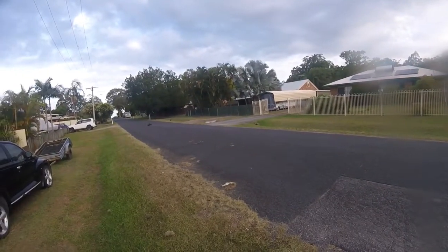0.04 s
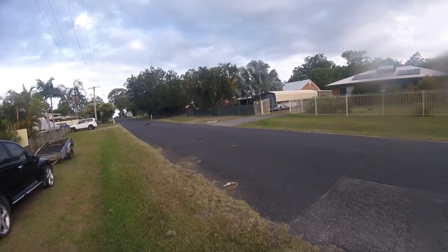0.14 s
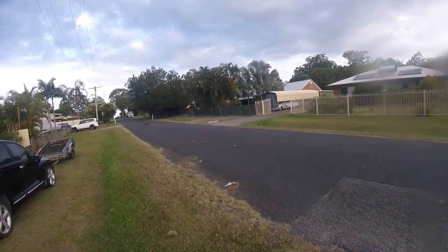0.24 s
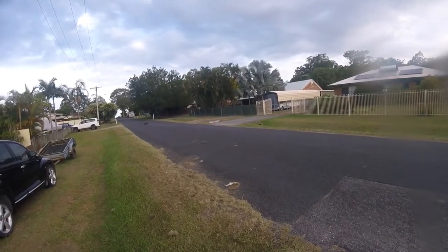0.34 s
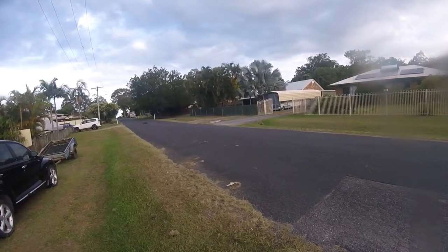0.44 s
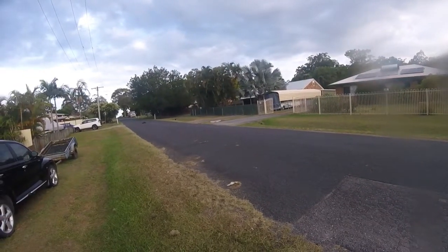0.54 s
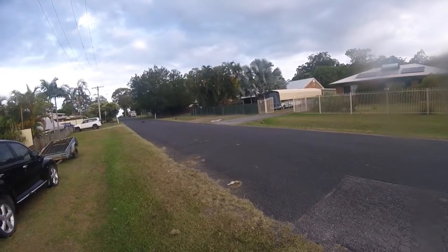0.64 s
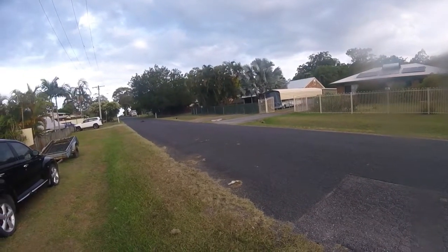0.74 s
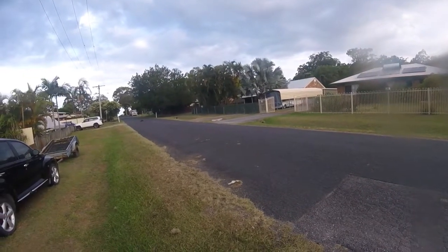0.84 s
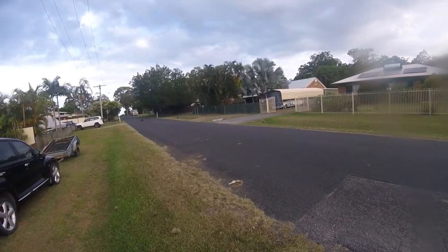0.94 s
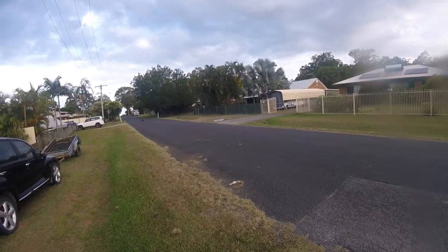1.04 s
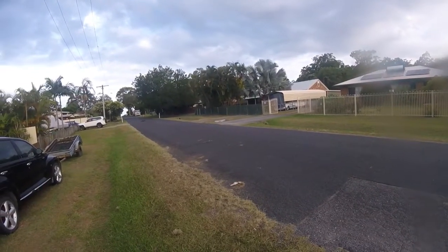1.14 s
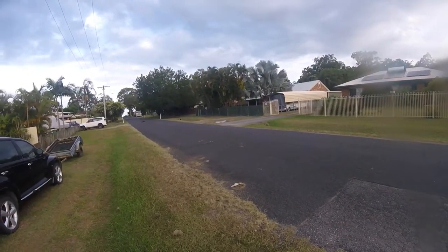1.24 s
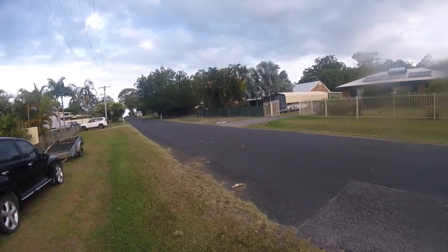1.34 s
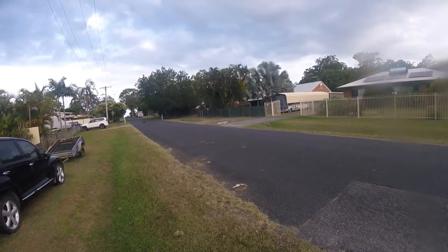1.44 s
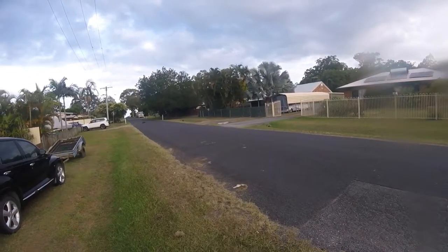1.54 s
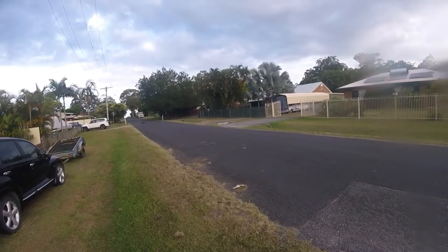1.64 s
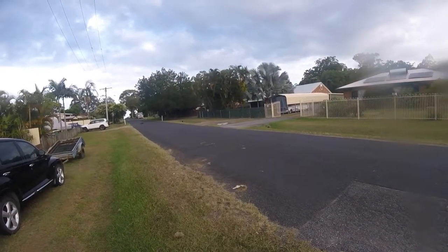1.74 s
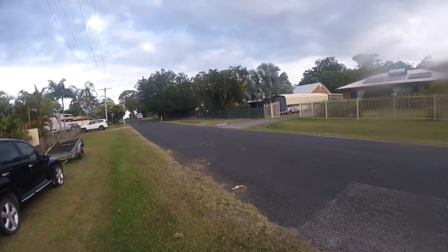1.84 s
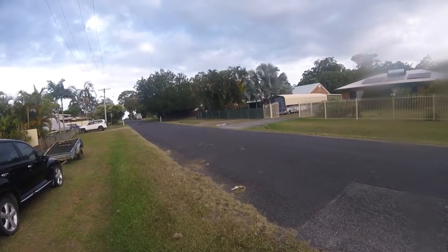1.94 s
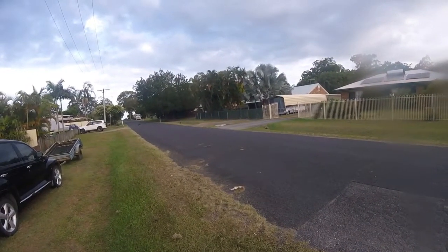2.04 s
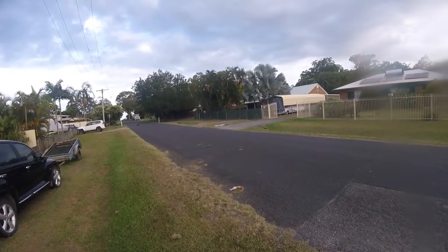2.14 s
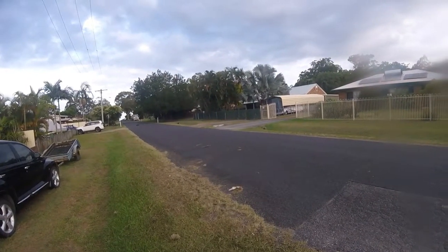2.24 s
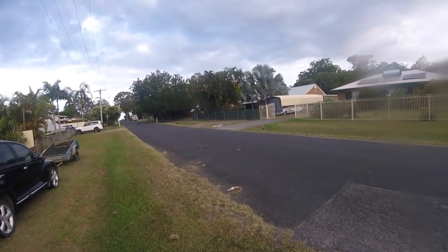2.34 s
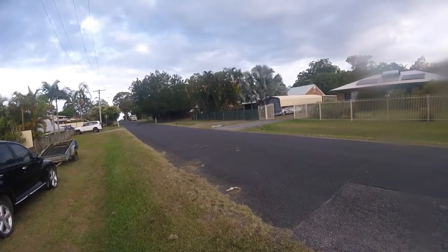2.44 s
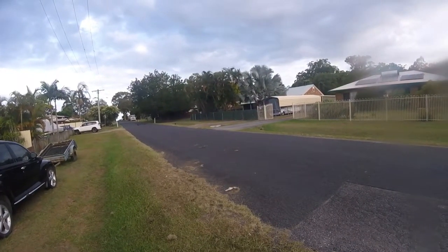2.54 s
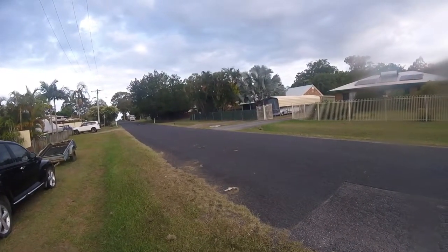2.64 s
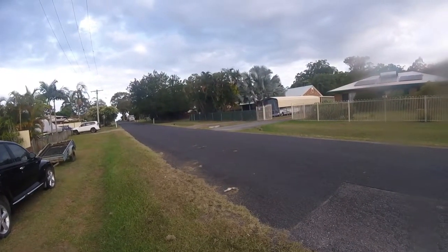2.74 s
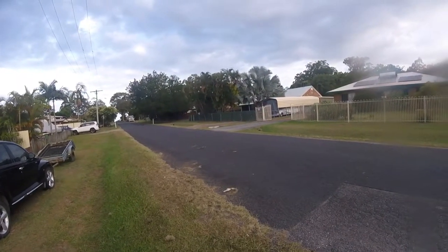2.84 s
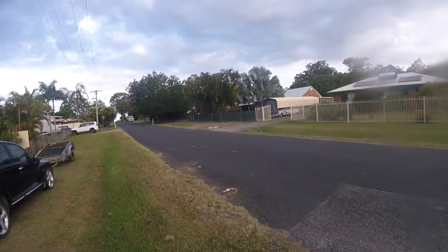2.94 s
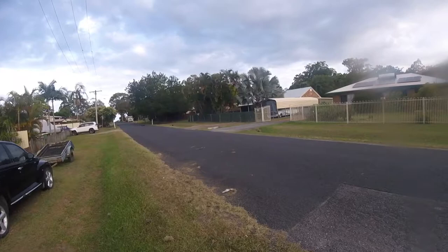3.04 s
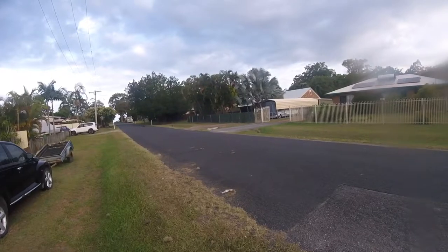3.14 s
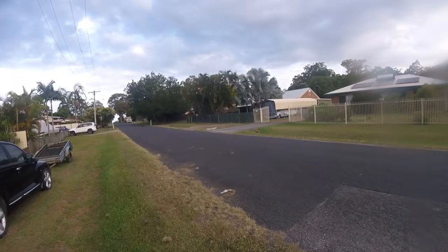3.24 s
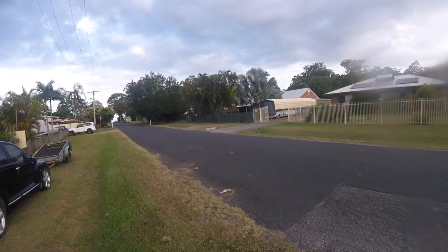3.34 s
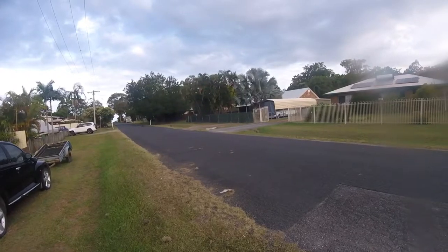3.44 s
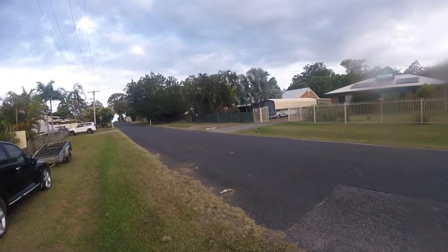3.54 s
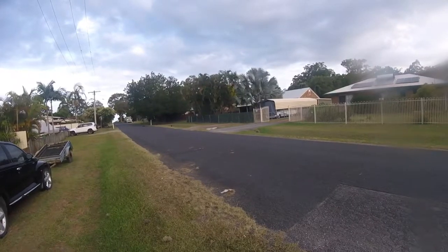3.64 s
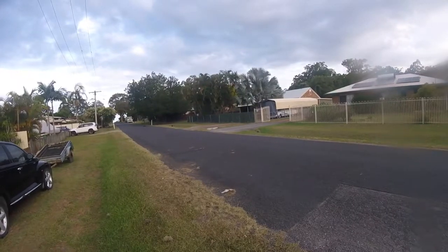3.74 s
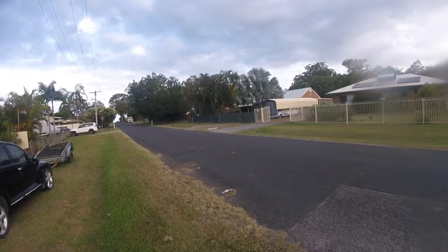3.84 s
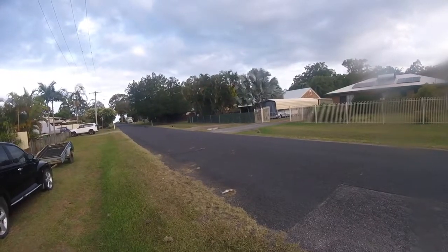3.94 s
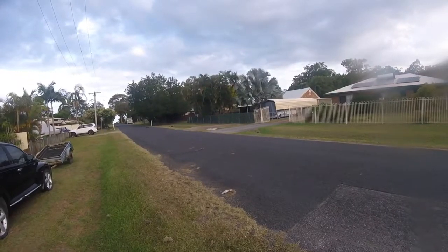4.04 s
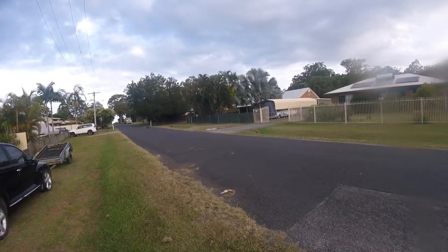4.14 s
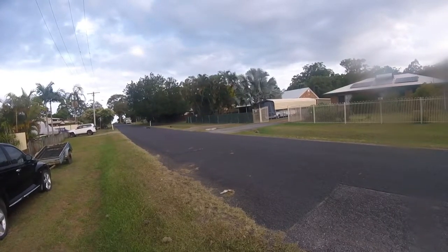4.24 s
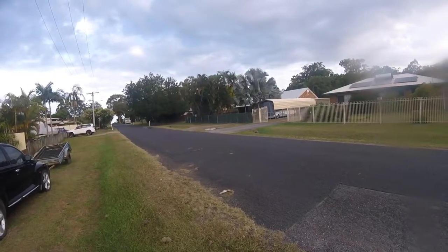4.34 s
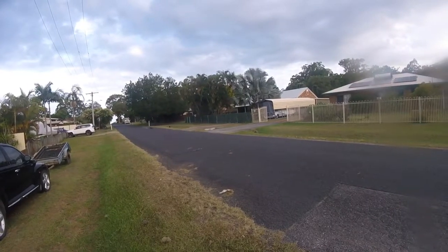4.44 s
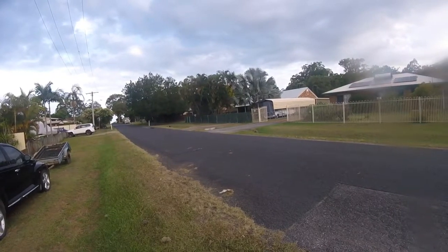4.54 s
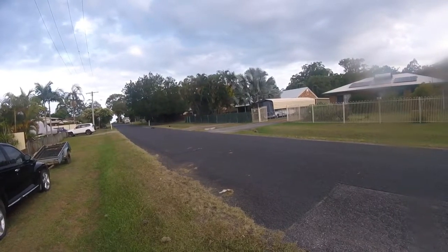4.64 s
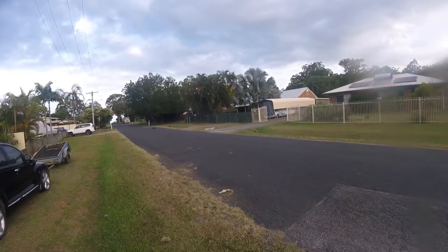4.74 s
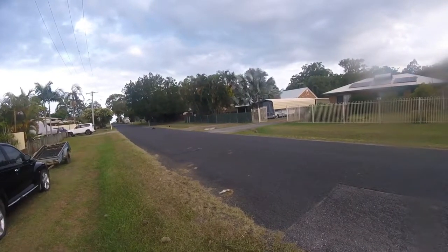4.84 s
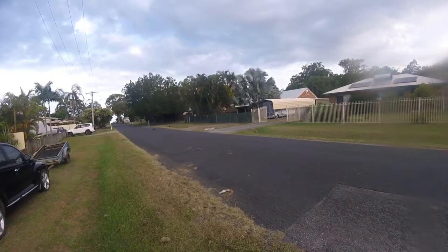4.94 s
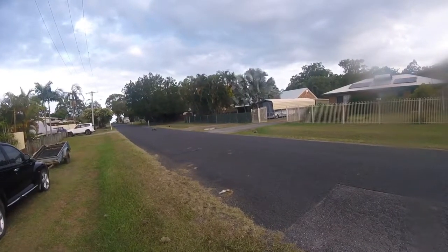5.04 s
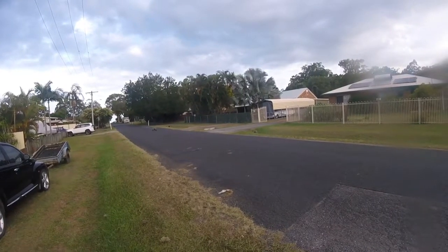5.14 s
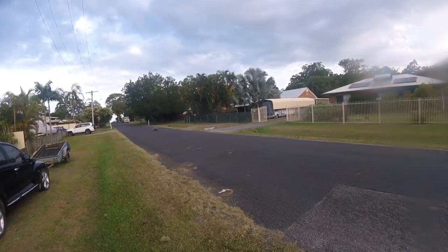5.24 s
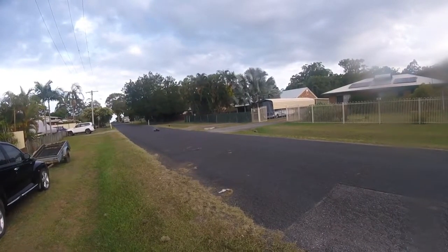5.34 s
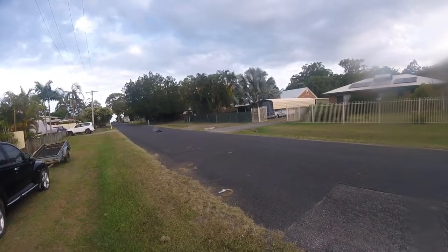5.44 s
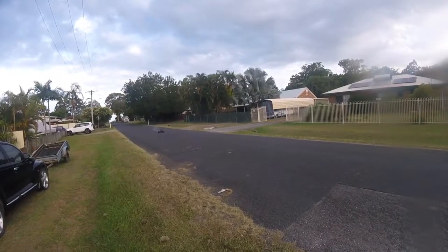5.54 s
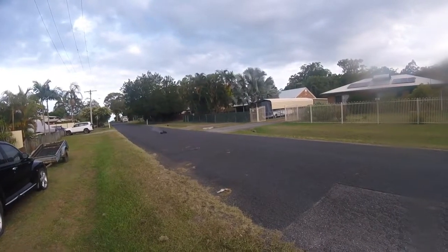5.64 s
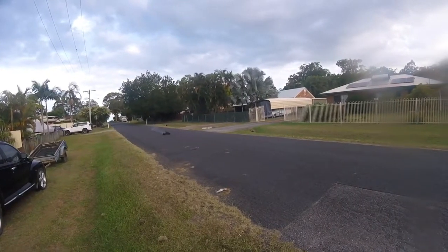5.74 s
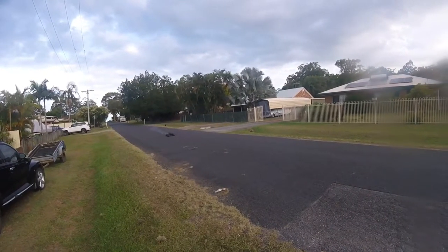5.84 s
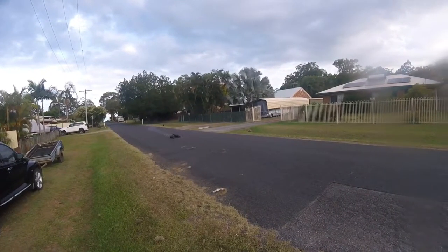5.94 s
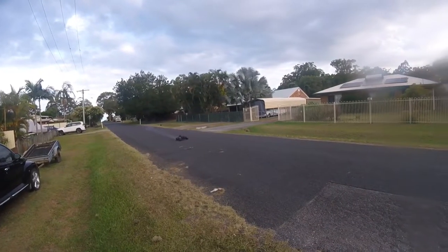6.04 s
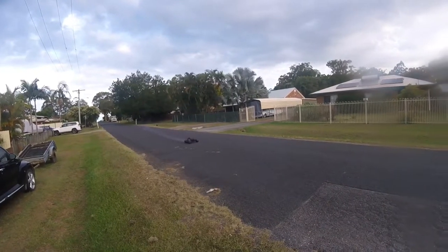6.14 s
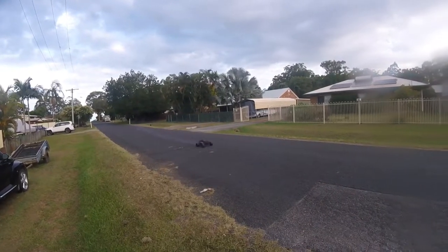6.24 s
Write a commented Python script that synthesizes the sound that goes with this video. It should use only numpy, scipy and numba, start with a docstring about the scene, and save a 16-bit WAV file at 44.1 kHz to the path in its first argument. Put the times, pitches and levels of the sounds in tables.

```python
"""A small glow-plug two-stroke in a model truck, far down a quiet street, heard on one microphone.
It lifts off, idles with uneven burning, then accelerates through a gear change and comes close.
Firings ring a tuned pipe, gas hisses, the clutch shoes rattle their bell and the tyres roar.
The road's echo hollows the sound; fences and houses scatter it over a low outdoor rumble.
A few dry ticks come just before the truck pulls away."""
import sys
import numpy as np
from scipy import signal
from scipy.fft import rfft, irfft, next_fast_len
from scipy.io import wavfile
from scipy.ndimage import uniform_filter1d
from numba import njit

SR = 44100
rng = np.random.default_rng(int(sys.argv[2]) if len(sys.argv) > 2 else 0)


def store_pcm(level_fs):
    """Save levels as 16-bit WAV."""
    pcm = np.round(np.clip(level_fs, -1, 1) * 32767).astype(np.int16)
    wavfile.write(sys.argv[1], SR, np.atleast_2d(pcm).T)


N = 277389
TIME = np.arange(N) / SR
HZ = np.fft.rfftfreq(2 * next_fast_len((N + SR) // 2, real=True), 1 / SR)

LIFT_S, OPEN_S, SHIFT_S = 0.3, 3.5, 5.085  # throttle shuts, throttle opens, second gear engages
LIFT_TAKES_S, OPEN_TAKES_S = 0.106, 0.056
COAST_S, EVEN_BURN_S, CLOSE_S = (.275, .64), (2.05, 2.3), (5.51, 6.28)  # start and end of each spell

# The run: lift-off, idle, blip, two gears. Each row: time in seconds, shaft rate in Hz, bark in dB.
ENGINE_RUN = [(0.0, 446, -19.5), (0.2, 458.5, -24), (0.26, 434.4, -25), (0.33, 351.4, -30.5),
              (0.4, 326.4, -33), (0.48, 312, -31.5), (0.61, 233.6, -35), (0.8, 218.7, -35),
              (1.6, 231.2, -36.5), (2.2, 233.3, -38.5), (2.45, 232.2, -38), (3.0, 237.3, -40.5),
              (3.47, 238.5, -40.5), (3.545, 346, -34.5), (3.58, 316, -34.5), (3.735, 314.5, -35),
              (3.775, 358, -31), (3.88, 387.5, -27.5), (4.2, 411.4, -27), (4.45, 444.6, -26.5),
              (4.56, 469.7, -25), (4.85, 494.3, -23.5), (5.03, 513.4, -23.5), (5.081, 510, -22),
              (5.092, 419.3, -23.5), (5.17, 436.4, -23.5), (5.38, 459, -23.5), (5.64, 464.7, -21),
              (5.9, 497.4, -17.5), (6.2, 510, -16.5), (6.25, 483, -18), (6.29, 477, -19.5)]
# The coasting engine catches now and then. Each row: centre in seconds, length in seconds.
COAST_CATCHES = [(0.306, 0.018), (0.368, 0.015), (0.392, 0.011), (0.417, 0.021), (0.498, 0.027),
                 (0.554, 0.026), (0.613, 0.05)]
# The truck as the microphone sees it. Each row: time in seconds, view (0 leaving, 1 pulling away,
# 2 far, 3 midway, 4 near, 5 close).
TRUCK_VIEW = [(0, 0.13), (.4, 0.16), (3.45, 1.25), (3.7, 1.39), (3.8, 2.11), (4.3, 2.37), (4.75, 3.3),
              (5.1, 2.96), (5.4, 3.73), (5.75, 4), (5.95, 5.22), (6.29, 5.14)]
# Hot pipe and shell under load, as the road reflects them. Each row: frequency in Hz, width in Hz,
# then relative level in dB for each of the six views.
PIPE_MODES = [(706, 91, -38, 0.5, -6, -39, -22, -26), (970, 256, -10.5, -9.5, -30, -9.5, -48, -15),
              (1212, 240, -34, -3.5, -13, -11, -40, -40), (1548, 236, -48, 1, -6.5, -5.5, -47, -21),
              (1833.4, 210, -3.5, 7.5, 7, -4, 4, 3.5), (1984, 564, 0.5, -28, -15, -1, -2, 0.5),
              (2325, 85, 5, 2, 7.5, -20, -9, -13), (2477, 194, 8.5, 4, 6.5, 4, -0.5, 1.5),
              (2736, 150, 2.5, 11, -14, 6, -0.5, 4), (3065, 86, -18, 8.5, 1, -2, 7.5, -5.5),
              (3547, 120, -27, -33, -15, -41, -14, -4.5), (3820, 99.6, -32, -46, -46, -23, -5, -14),
              (4190, 120, -28, -27, -16, -8.5, -14, -26), (4620, 100, -26, -30, -9, -14, -5.5, -25),
              (5045, 140, -9.5, -27, -8, -9.5, -9, -30), (5610, 260, -15, -30, -14, -11.5, -16, -15)]
# The pipe's tone. Each row: time in seconds, level in dB against the bark.
PIPE_TONE_LEVEL = [(0, -2.5), (.26, -2), (.33, -28), (.6, -1), (.85, -5), (1.1, -6.5), (1.3, -1), (2.0, -3),
                   (3.45, 5.5), (3.6, 3.5), (3.9, 4.5), (5.1, 2), (5.65, 6), (5.85, 1), (5.98, 5),
                   (6.17, 4.5), (6.21, 1.5), (6.25, -2), (6.29, -2)]
# Spectrum of the exhaust hiss. Each row: frequency in Hz, relative level in dB.
GAS_COLOUR = [(2400, -46), (3300, 0.5), (4200, 2.5), (5200, 3), (6500, 0), (7600, -4), (8800, -8.5),
              (9600, -21), (10800, -19), (11500, -34.5)]
# Rings of the loose clutch bell. Each row: frequency in Hz, width in Hz, relative level in dB.
LOOSE_BELL_MODES = [(5870, 420, 0), (6260, 520, -3), (7200, 350, -8), (7550, 450, -11)]
# Rattle of the loose bell. Each row: time in seconds, level in dB with the throttle fully shut.
LOOSE_BELL_LEVEL = [(0, -14), (.46, -46.5), (.5, -41), (1.1, -50), (1.9, -47), (2.9, -45.5), (3.05, -50.5),
                    (3.6, -49)]
# Ring of the gripping bell. Each row: time in seconds, frequency in Hz, level in dB against the gas.
GRIPPING_BELL = [(0, 6380, 0.5), (3.6, 6440, -1.5), (4.3, 6300, -5), (4.65, 6320, -2), (4.95, 6587, 1),
                 (5.15, 6394, -7), (5.35, 6140, -7), (5.55, 6296, -6), (6.0, 6577, -7), (6.29, 6350, -2)]
# Spectrum of tyres and chassis. Each row: frequency in Hz, relative level in dB.
TYRE_COLOUR = [(110, -18), (190, -9.5), (280, 1), (600, -6.5), (900, -2), (1300, -7), (2000, -70)]
# Gaps where the road's echo cancels the direct sound. Each row: time in seconds, then frequency in Hz
# and depth from 0 to 1 for the low, the middle and the high gap.
ROAD_GAPS = [(0, 1620, 0.5, 2020, 0.8, 3700, 0.3), (.3, 1530, 0.7, 1970, 0.8, 3500, 0.7),
             (.6, 1250, 0.8, 2070, 0.04, 3400, 0.6), (3.5, 1240, 0.85, 2400, 0.6, 3610, 0.3),
             (3.75, 1310, 0.03, 2450, 1, 3640, .6), (4.15, 1287, 0.04, 2066, 0.8, 3670, 0.49),
             (4.45, 1335, 0.06, 2207, 0.36, 3592, 0.5), (5.0, 1380, 0.07, 2250, 0, 3900, 0.8),
             (5.3, 1600, 0.4, 1975, 0, 3744, 0.71), (5.6, 1632, 1, 2257, 0.27, 4040, 0.7),
             (5.9, 1630, .95, 2135, 0.39, 4112, 0.6), (6.29, 1670, .95, 2290, 0.48, 4144, 0.97)]
# Spectrum of the outdoor rumble. Each row: frequency in Hz, relative level in dB.
RUMBLE_COLOUR = [(12, -31), (20, 3.5), (32, -4), (92, -2.5), (135, -7), (156, -8), (190, -24),
                 (250, -45), (420, -120)]
# One idle firing, through pipe, shell and road. Each row: frequency in Hz, relative level in dB.
IDLE_FIRING_COLOUR = [(60, -107), (300, 20.5), (460, 18), (700, 13.5), (810, 1), (950, 6.5), (1250, 6),
                      (1670, 12.5), (1900, 6.5), (2160, 13.5), (2500, 8), (2870, 9), (3500, -3.5),
                      (6000, -29)]
# A ring in the idle rasp that shifts as the truck turns round. Each row: time in seconds,
# frequency in Hz, gain of the added band in dB.
TURNING_RING = [(.6, 2810, -6), (1.9, 2830, 2.5), (2.1, 1738, -7), (2.25, 1644, 3), (2.4, 1710, -1),
                (2.6, 2028, -3), (3.05, 2265, -3), (3.2, 2340, 13), (3.3, 2200, -19), (3.45, 1720, -5)]
# Dry ticks. Each row: time in seconds, level at the onset in dB.
DRY_TICKS = [(3.2581, -36), (3.28, -32), (3.2994, -34), (3.3231, -34), (3.3563, -39)]
# Spectrum of a tick. Each row: frequency in Hz, relative level in dB.
DRY_TICK_COLOUR = [(1500, -27), (2500, 7), (4500, 0), (6500, 3), (8000, -5), (9500, -37)]
# Rings of the buzzing shell. Each row: frequency in Hz, width in Hz, relative level in dB.
SHELL_MODES = [(2440, 186, -1), (2800, 180, 14), (3200, 113, -20)]


def undb(db):
    """Decibels to amplitude."""
    return 10 ** (np.asarray(db) / 20)


def unit(x):
    """Scale to rms 1."""
    return x / np.sqrt(np.mean(x ** 2))


def curve(rows):
    """Columns of a time table, one value a sample."""
    s, *columns = np.transpose(rows)
    return [np.interp(TIME, s, c) for c in columns]


def ramp(start_s, end_s):
    """0 before the start, 1 after the end, straight between."""
    return np.interp(TIME, [start_s, end_s], [0, 1])


def fade(start_s, lasts_s):
    """Jumps to 1 at the start and dies away."""
    since = TIME - start_s
    return (since > 0) * np.exp(-np.abs(since) / lasts_s)


def through(x, response):
    """Filter by a frequency response given on HZ."""
    return irfft(rfft(x, 2 * len(HZ) - 2) * response)[:N]


def low_cut(hz):
    """Response of a one-pole high-pass."""
    return 1 / (1 + hz / (1j * HZ + 1e-9))


def colour(points):
    """Causal response of (Hz, dB) points, by folding the cepstrum of the log gain."""
    hz, db = np.transpose(points)
    cepstrum = irfft(np.log(undb(np.interp(np.log(HZ + 1), np.log(hz), db))))
    cepstrum[1:len(HZ) - 1] *= 2
    cepstrum[len(HZ):] = 0
    return np.exp(rfft(cepstrum))


def resonances(modes, flip=1):
    """Double band-passes of (Hz, width, dB); a negative flip fills the valleys between neighbours."""
    f = HZ + 1e-9
    return sum(flip ** k * undb(db) / (1 + 1j * (f - hz * hz / f) / width) ** 2
               for k, (hz, width, db) in enumerate(modes))


def noise(response):
    """Filtered noise at rms 1."""
    return unit(through(rng.standard_normal(N), response))


def sway(hz, width_hz):
    """Random swing about a rate, spread 1."""
    return noise(resonances([(hz, width_hz, 0)]))


def clicks(at, size):
    """Band-limited clicks at fractional sample places."""
    taps = np.floor(at)[:, None] + np.arange(-7, 9)
    offset = taps - at[:, None]
    shape = np.sinc(offset) * np.cos(np.pi * offset / 16) ** 2
    return np.bincount(np.clip(taps, 0, N - 1).astype(int).ravel(), (size[:, None] * shape).ravel(), N)


def band_unit(x, weight, lo, hi):
    """Scale to rms 1 inside a band, counting time by weight."""
    part = through(x, (HZ > lo) & (HZ < hi))
    return x / np.sqrt(np.average(part ** 2, weights=weight))


@njit
def band(x, hz, width_hz):
    """State-variable band-pass whose centre moves, gain 1 at the centre."""
    y, mid, low = np.empty(len(x)), 0., 0.
    for i in range(len(x)):
        g, damping = np.tan(np.pi * hz[i] / SR), width_hz / hz[i]
        v = (mid + g * (x[i] - low)) / (1 + g * (g + damping))
        mid, low, y[i] = 2 * v - mid, low + 2 * g * v, damping * v
    return y


def driver(hz):
    """Lift, open, shift: gives throttle, weakening of every other turn and spread of shaft speed."""
    opened = ramp(OPEN_S - OPEN_TAKES_S / 2, OPEN_S + OPEN_TAKES_S / 2)
    idling = ramp(LIFT_S - LIFT_TAKES_S / 2, LIFT_S + LIFT_TAKES_S / 2) - opened
    throttle = np.interp(idling, [0, 1], [.94, .074])
    top_of_first_gear = (TIME < SHIFT_S) * np.interp(hz, [458, hz.max()], [0, 1])
    skip = .046 * (1 - idling) + .3 * idling * np.exp(-TIME) + .34 * top_of_first_gear
    road_shake = .0035 + .0023 * (TIME - OPEN_S)  # grows with road speed
    shake = .012 * (1 - opened - idling) + .014 * idling + opened * road_shake
    return throttle, skip, shake


def choking(coast):
    """A starved cylinder burns for some turns, then chokes on its own fumes; 1 is fully choked."""
    even_burn = (TIME > EVEN_BURN_S[0]) * (TIME < EVEN_BURN_S[1])
    fumes = .22 - .11 * np.minimum(TIME, OPEN_S) - 1.7 * even_burn  # clearing through the idle
    choked = .5 + .5 * np.tanh(3 * (sway(27, 24) + fumes) - .8)
    caught = sum(np.exp(-(2 * (TIME - s) / length) ** 4) for s, length in COAST_CATCHES)
    return (1 - coast) * choked + coast * np.clip(.62 - caught, 0, 1)


def shaft_turns(hz, shake, choked, closed):
    """Turns so far: bumps shake the shaft; at idle it gains speed burning and sags while choked."""
    push = uniform_filter1d(choked, size=SR // 4) - choked
    surge = closed * unit(through(push, 1 / (1 + 1j * HZ / 6)))  # leaks away below 6 Hz
    return np.cumsum(hz * (1 + shake * sway(25.3, 49) + .026 * surge)) / SR


def cylinder(hz, turns, burn, skip, closed, coast):
    """One firing a turn, scattered in time at idle, coasting and as the clutch bites; also the sizes."""
    count = np.arange(int(turns[-1]) + 1)
    at = np.interp(count, turns, np.arange(N))
    index = at.astype(int)
    time_luck, size_luck = np.tanh(.7 * rng.standard_normal((N // 64, 2))[:len(count)].T)
    bite = fade(OPEN_S, .4) + fade(SHIFT_S, .2) / 2
    scatter_s = 12e-6 + 170e-6 * closed ** 2 + 120e-6 * bite + 300e-6 * coast
    late = SR * scatter_s[index] * time_luck
    weak = (skip * np.clip(1 + 1.5 * sway(15.3, 40), 0, 2))[index] * (count % 2)
    size = burn[index] * np.clip(1 - weak, .05, 1) * undb((.9 + 1.2 * closed[index]) * size_luck)
    size *= 1 + .6 * np.clip(np.gradient(burn[index]), 0, 1)  # unburnt fuel joins the next charge
    return unit(clicks(at + late, size) / np.sqrt(hz)), size


def gas_flow(turns, burn):
    """Turbulent gas follows each firing down the pipe: a near-steady blow and a pulsing rasp."""
    phase = turns % 1
    blow = unit((.5 + np.exp(-phase / 21)) * burn ** .0087 * rng.standard_normal(N))
    spit = unit((.5 + np.exp(-phase / .7)) * burn ** .05 * blow)
    return blow, through(spit, low_cut(1000) ** 2)


def loaded_bark(firings, blow, throttle, view_weights):
    """Firings and gas ring the hot pipe; each ring swells and sinks alone as the shell rocks."""
    grit = .09 + .42 * (fade(OPEN_S, .3) + fade(SHIFT_S, .3))  # a slipping clutch roughens the flow
    drive = firings + grit * blow
    rings = np.zeros(N)
    for hz, width, *view_db in PIPE_MODES:
        gain = np.dot(undb(view_db), view_weights) * undb(1.1 * sway(4, 8))
        rings += gain * through(drive, resonances([(hz, width, 0)]))
    return np.sqrt(throttle) * band_unit(rings, throttle, lo=1400, hi=3400)


def pipe_tone(turns, size, throttle, coast, skip):
    """The piston pumps the pipe even on a bad burn; weak alternate turns add a half-rate throb."""
    follows_burn = .3 + .5 * np.maximum(throttle, coast)
    pump = np.interp(turns - .5, np.arange(len(size)), size) ** follows_burn
    tone = np.sqrt(2) * undb(curve(PIPE_TONE_LEVEL)[0]) * pump * np.sin(2 * np.pi * turns)
    throb = throttle * np.clip(skip * (1 + .5 * sway(19, 14)), 0, 1)
    return tone + undb(-4) * throb * np.sin(np.pi * turns)


def gas_hiss(blow, burn, bark_db, gas_db):
    """Gas hisses from the outlet; the air takes the top off when the truck is far and quiet."""
    hiss = band_unit(through(blow, colour(GAS_COLOUR)), np.ones(N), lo=3000, hi=5430)
    top_gain = undb(.28 * (bark_db + 31.5))
    hiss += (top_gain - 1) * through(hiss, HZ > 7700)
    return undb(gas_db + .7 * sway(5.3, 22)) * burn ** .069 * hiss


def clutch_bell(turns, throttle, gas_db):
    """The shoes knock the bell once a turn: several rings while loose, one moving ring as they grip."""
    pulse = .64 + np.exp(-((turns + .5) % 1) / .63)
    knock = pulse * undb(2 * sway(9.7, 90)) * rng.standard_normal(N)
    loose = unit(through(knock, resonances(LOOSE_BELL_MODES, flip=-.9)))
    loose *= undb(curve(LOOSE_BELL_LEVEL)[0] + 1.5 * sway(3.18, .8))
    grip_hz, grip_db = curve(GRIPPING_BELL)
    grip = unit(band(band(knock, grip_hz, width_hz=460.), grip_hz, width_hz=460.))
    grip *= undb(gas_db + grip_db + 2.2 * sway(6, 14))
    return (1 - throttle) * loose + throttle * grip


def tyres(throttle, view, view_weights):
    """Tyres roar under throttle; the chassis adds bass when the truck is leaving or close."""
    level_db = -18.5 + .8 * view - 1.5 * ramp(*CLOSE_S) + 2 * sway(14.7, 19)  # against the bark
    roar = throttle * undb(level_db) * noise(colour(TYRE_COLOUR))
    thrum = (view_weights[0] + view_weights[-1]) * through(roar, HZ < 223)
    return roar + undb(5.5) * thrum


def road_echo(x):
    """The road's echo cancels three wandering bands at the microphone."""
    columns = curve(ROAD_GAPS)
    for hz, depth, width_hz in zip(columns[::2], columns[1::2], (130., 70., 160.)):
        for _ in range(2):
            x = x - depth ** 2 * band(x, hz, width_hz)
    return x


def street_echoes(x, t60_s=.21, dull_hz=3500):
    """Scattered echoes of fences and house fronts, duller than the direct sound."""
    s = np.arange(SR) / SR
    tail = rng.standard_normal(SR) * undb(-60 * s / t60_s) * (s > .012)
    tail /= np.sqrt(np.sum(tail ** 2))
    return through(x, rfft(tail, 2 * len(HZ) - 2) / (1 + 1j * HZ / dull_hz))


def rumble():
    """Far traffic and light air on the microphone."""
    return noise(colour(RUMBLE_COLOUR)) * undb(-55.5 + 2.2 * sway(1.9, 8))


def idle_bark(sputter, closed):
    """The idle sputters through pipe and shell; low harmonics gain on the rasp as the truck turns."""
    idle = band_unit(through(sputter, colour(IDLE_FIRING_COLOUR)), closed, lo=480, hi=2900)
    body = through(idle, HZ < 1200)
    start_s, end_s = EVEN_BURN_S
    even_burn = ramp(start_s - LIFT_TAKES_S, start_s) - ramp(end_s, end_s + OPEN_TAKES_S)
    rasp = undb(-4.5 * even_burn) * (idle - body)
    turned = ramp(2.26, 2.73) * (1 - ramp(OPEN_S, SHIFT_S))
    body += (undb(4 * turned) - 1) * through(body, (HZ > 590) & (HZ < 1200))
    idle = rasp + undb(turned) * body
    ring_hz, ring_db = curve(TURNING_RING)
    return np.sqrt(closed) * (idle + undb(ring_db) * band(idle, ring_hz, width_hz=75.))


def ticks(decay_s=.0016):
    """Very short bursts of noise, bright and dry."""
    bursts = sum(undb(db) * fade(s - decay_s / 2, decay_s) for s, db in DRY_TICKS)
    return bursts * noise(colour(DRY_TICK_COLOUR))


def shell_snarl(sputter):
    """The shell buzzes while the clutch first bites."""
    swell = ramp(OPEN_S - .02, OPEN_S + .021) * fade(OPEN_S - .02, .12)
    return undb(-6) * swell * unit(through(sputter, resonances(SHELL_MODES)))


def model_truck():
    """The whole truck from the microphone's place: one shaft times pipe, gas and clutch bell."""
    hz, bark_db = curve(ENGINE_RUN)
    view = curve(TRUCK_VIEW)[0]
    view_weights = [np.clip(1 - abs(view - k), 0, 1) for k in range(6)]
    throttle, skip, shake = driver(hz)
    closed = 1 - throttle
    coast = ramp(COAST_S[0] - .02, COAST_S[0]) - ramp(COAST_S[1], COAST_S[1] + .02)
    choked = choking(coast)
    burn = 1 - .88 * np.maximum(np.sqrt(closed), coast) * choked
    turns = shaft_turns(hz, shake, choked, closed)
    firings, size = cylinder(hz, turns, burn, skip, closed, coast)
    blow, rasp = gas_flow(turns, burn)
    sputter = firings + 1.3 * rasp
    bark = loaded_bark(firings, blow, throttle, view_weights)
    bark += idle_bark(sputter, closed) + shell_snarl(sputter)
    tone = pipe_tone(turns, size, throttle, coast, skip)
    gas_db = -53.5 + .59 * (bark_db - bark_db.min())
    gas_db += np.interp(hz, (212, 306), (0, 5.5)) + 8 * ramp(*CLOSE_S)  # more when revving or close
    hiss = gas_hiss(blow, burn, bark_db, gas_db)
    bell = clutch_bell(turns, throttle, gas_db)
    roar = tyres(throttle, view, view_weights)
    level = undb(bark_db)
    truck = level * tone + bell + road_echo(level * (bark + roar) + hiss)
    return through(truck, low_cut(130) ** 3)  # the tiny outlet radiates no bass


def scene():
    """The truck in the street; one capsule feeds both channels."""
    truck = model_truck()
    mono = truck + undb(-12) * street_echoes(truck) + rumble() + ticks()
    return np.array([mono, mono])


def record(dry, top_hz=11500):
    """The top is cut steeply."""
    return signal.sosfilt(signal.ellip(10, .2, 70, top_hz, fs=SR, output="sos"), dry)


dry = scene()
out = record(dry)
store_pcm(out)
```